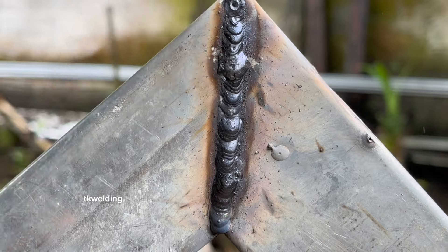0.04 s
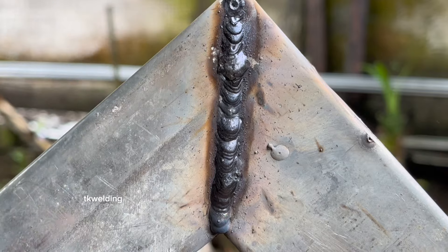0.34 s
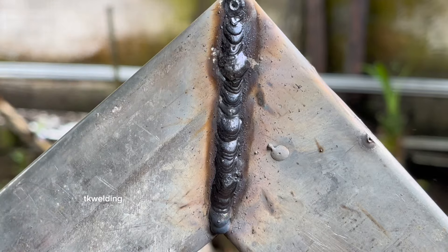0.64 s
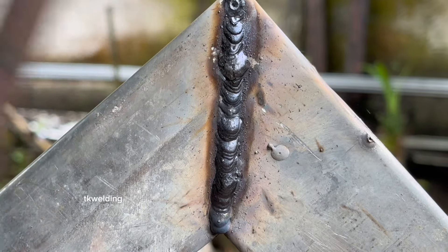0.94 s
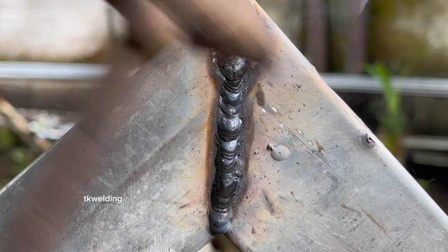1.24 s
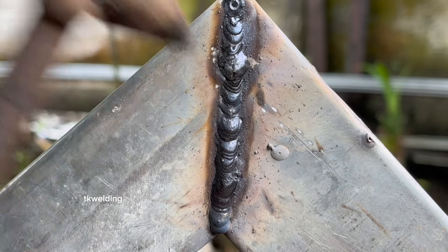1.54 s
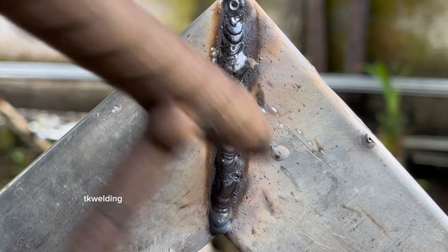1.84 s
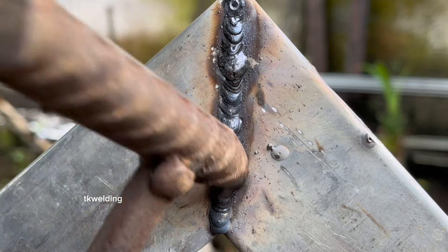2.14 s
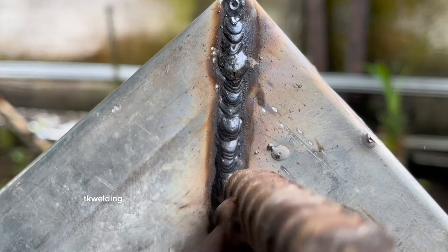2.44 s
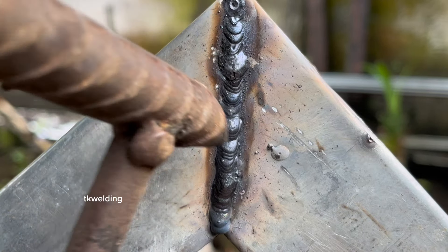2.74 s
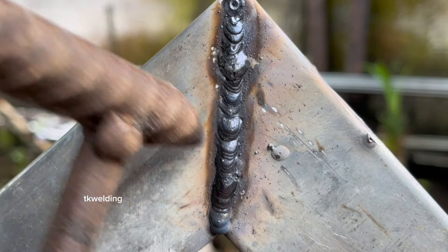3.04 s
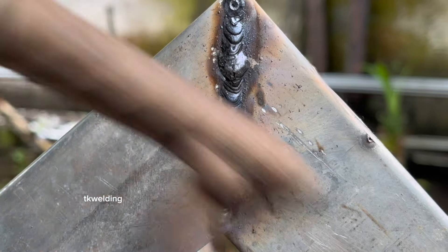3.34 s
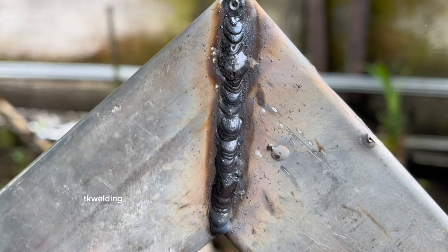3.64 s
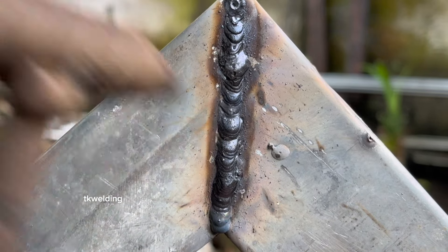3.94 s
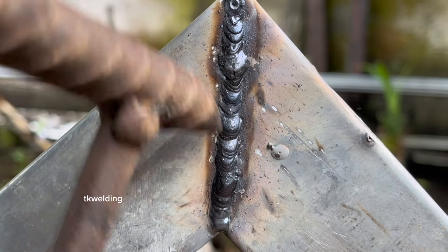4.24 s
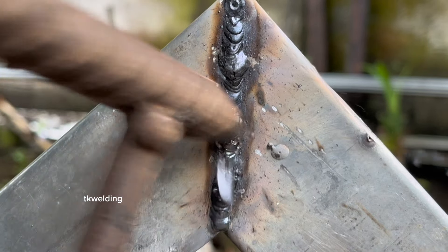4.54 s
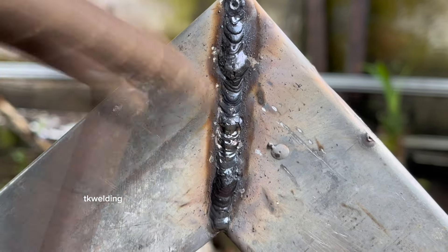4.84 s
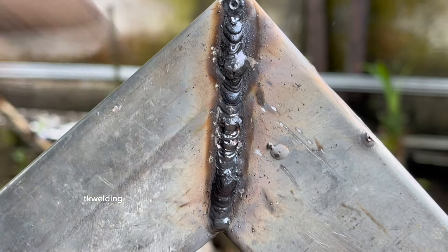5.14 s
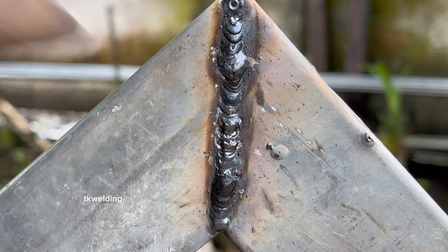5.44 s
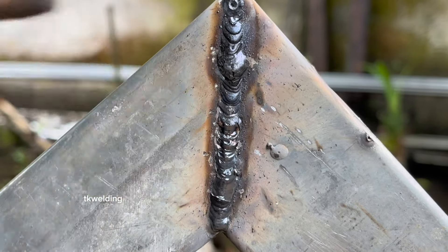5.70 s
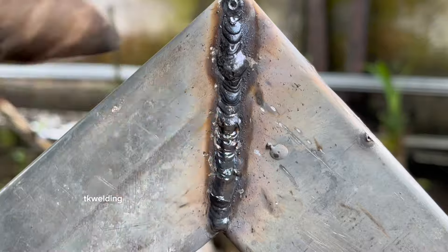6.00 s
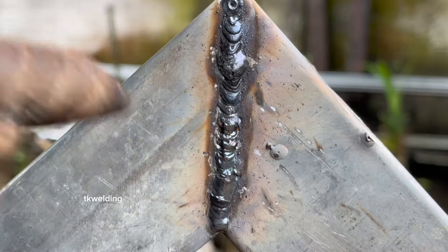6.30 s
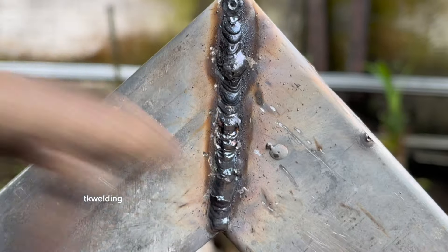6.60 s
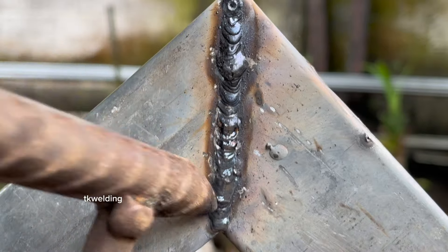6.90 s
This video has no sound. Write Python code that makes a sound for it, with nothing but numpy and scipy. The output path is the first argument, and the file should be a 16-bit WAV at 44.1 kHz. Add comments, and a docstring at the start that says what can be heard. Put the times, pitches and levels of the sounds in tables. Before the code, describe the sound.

A hammer knocks on a welded steel pipe in steady, sharp, clanging blows, each ringing briefly, close up in a workshop.

```python
"""A chipping hammer knocks slag off the weld of a mitred steel pipe, close to a phone mic in a workshop.
Each blow cracks, thuds, clangs and leaves pipe and hammer ringing; where the tip lands decides which
modes speak. Early on the tip skids on the bead, and now and then flakes of slag tick down.
The room answers over a faint, distant hum and hiss; at this range the phone rounds the peaks."""
import sys
import numpy as np
from scipy import signal
from scipy.fft import rfft, irfft, next_fast_len
from scipy.io import wavfile

SR = 44100
rng = np.random.default_rng(int(sys.argv[2]) if len(sys.argv) > 2 else 0)


def output_pcm(signal):
    """Save a mono or channel-first signal as 16-bit PCM at the path in sys.argv[1].

    Samples are clipped to [-1, 1] before scaling.
    """
    pcm = np.clip(np.atleast_2d(signal).T, -1, 1) * 32767
    wavfile.write(sys.argv[1], SR, np.round(pcm).astype(np.int16))


N = 311346

# blows on the weld: (time [s], place along it [0-1], place across it [0-1], force [dB], pipe ring [dB],
# clang pitch [Hz], clang level [dB], handle ring [dB])
HAMMER_BLOWS = [(0.1249, 0.18, 0.48, -1.5, 0.5, 1056, -21.5, -23.5),
                (0.4529, 0.92, .58, -1.5, -2, 1378, -27, -22.5),
                (0.7506, 0.19, 0.01, 0, -2, 1300, -19.5, -22.5), (1.075, .18, 0.09, 0, 3, 1326, -15.5, -32),
                (1.4165, 0.25, .46, 0.5, -1, 1277, -21.5, -37),
                (1.7294, 0.68, 0.73, 3, -3.5, 1360, -27.5, -44),
                (2.056, 0.92, 0.54, 0.5, -1.5, 1434, -20, -32),
                (3.3412, .2, 0.87, -1.5, -1.5, 1084, -16.5, -41),
                (3.7702, 0.64, 0.07, -1, -3.5, 1275, -31.5, -20),
                (4.1965, 0.52, .15, -1.5, -2, 1034, -33.5, -22),
                (4.522, 0.79, 0.83, 2.5, 0, 1056, -26, -26), (4.8583, 0.8, 0.42, 3, 0.5, 1093, -20, -22.5),
                (5.1907, .76, 0.81, 0, -0.5, 1090, -21.5, -41),
                (5.4978, 0.76, 0.76, -1, -0.5, 1300, -20.5, -47),
                (5.8065, .36, 0.06, 1, -1, 1307, -20, -34),
                (6.0947, 0.74, 0.26, -1.5, -2.5, 1346, -20, -36),
                (6.3722, 0.38, 0.9, 1, -2.5, 1269, -16, -25), (6.6367, 0.45, .82, -.5, 2, 1498, -22, -40),
                (6.8913, 0.04, 0.05, 2.5, -8.5, 1340, -17, -27.5)]
# clear modes of the pipe: (pitch [Hz], level [dB], t60 at the usual clang [s],
# shape along the weld [half waves], shape across it [half waves], antinode offset [half waves])
RING_MODES = [(222, -43.5, 1, 2.44, -2.51, 0.32), (277, -45, 1, 3.39, 1.53, 0.61),
              (528, -39, 0.7, 2.77, 0.03, 0.06), (1018, -25, 0.18, 3.17, 1.74, 0.05),
              (1051, -22, 0.32, 2.25, 1.35, 0.93), (1116, -23, 0.25, 0.46, -1.33, 0.44),
              (1240, -21, 0.24, 0.48, 2.61, 0.26), (1399, -27, 0.2, 3.12, 0.67, 0.59),
              (1545, -32, 0.22, 2.92, 0.28, 0.91), (1644, -24, 0.26, 2.03, -2.41, 0.12),
              (2253, -28, 0.22, 0.85, 2.55, 0.15), (2392, -36, 0.42, 3.03, 2.23, 0.66),
              (2546, -30, 0.34, 3.03, -0.5, 0.27), (3017, -27, 0.24, 2.77, -2.52, 0.34),
              (3220, -11.5, 0.28, 1.04, 2.24, 0.15), (3262, -18, 0.16, 0.8, -2.14, 0.46),
              (3378, -25, 0.21, 2.34, -1.94, 0.48), (3592, -24, 0.19, 2.64, 1.33, 0.37),
              (3836, -34, 0.28, 0.76, -1.85, 0.07), (4185, -31, 0.26, 0.95, -2.32, 0.57),
              (4603, -37, 0.2, 1.81, 0.89, 0.15), (4780, -31, 0.18, 1.56, 0.68, 0.87),
              (6244, -33, 0.23, 0, 0.65, 0.08)]
# the tip grazing or skidding on the bead: (time [s], scratch level [dB], head ring [dB])
TIP_SKIDS = [(0.3912, -18, -21), (0.4968, -25, -42.5), (0.5173, -27, -38.5), (0.6003, -41.5, -45.5),
             (0.61, -32, -22), (0.636, -34.5, -35)]
# flakes of slag landing: (time [s], level [dB], pitch [Hz])
SLAG_FLAKES = [(0.568, -42, 10100), (2.162, -46, 8200), (2.215, -43, 8050), (2.225, -47, 8500),
               (2.292, -68, 8070), (4.441, -59, 11800), (5.044, -61, 8700), (5.7605, -65, 10200)]
# spectra of the sources and of the room's answer: (frequency [Hz], relative level [dB])
BACKGROUND_COLOUR = [(25, -34.5), (65, -8.5), (190, -21.5), (354, -12.5), (470, -16.5), (540, -6),
                     (650, -19.5), (1000, -20), (2000, -25), (3500, -27.5), (7100, -34.5), (16000, -48)]
CRACK_COLOUR = [(300, -31), (900, 1.5), (1500, -1.5), (2100, 1.5), (2900, 0), (5000, -6), (9000, -9),
                (12000, -20.5), (16000, -25)]
SHIMMER_COLOUR = [(300, -10), (700, -8.5), (1200, 2), (2000, -3), (3000, 2), (4500, -4.5), (7000, -9.5),
                  (9500, -11.5), (12000, -21), (16000, -23.5)]
THUD_COLOUR = [(40, -45), (70, -28.5), (130, -12.5), (300, -2.5), (530, 4), (780, -1), (1500, -1.5),
               (3000, -26.5)]
SCRATCH_COLOUR = [(200, -21), (800, -18), (3000, 2.5), (7000, 4.5), (10000, -0.5), (16000, -11.5)]
ROOM_COLOUR = [(40, -10.5), (110, 6.5), (185, -1.5), (290, 6.5), (420, -3.5), (900, -6.5), (2000, -9.5),
               (5000, -7.5), (16000, -22)]
# ring times of the crowded wall modes and of the room: (frequency [Hz], t60 [s])
SHIMMER_DECAY = [(300, 0.19), (1200, .2), (3000, 0.18), (6000, 0.16), (16000, .15)]
ROOM_DECAY = [(60, 0.6), (250, 0.89), (600, .8), (1500, 0.57), (5000, 0.5), (16000, 0.95)]

TOP_HZ, RING_S = 15800, 1.2
AGE = np.arange(int(RING_S * SR)) / SR  # time since a touch [s]
CRACK_DB, SHIMMER_DB, THUD_DB, HEAD_DB = -10.5, -19.5, -18, -14
TREBLE_DB, TREBLE_FROM_HZ, TREBLE_FULL_HZ = -0.8, 1500, 4500
# the touch of the tip detunes pipe and hammer a little at every blow [share of the pitch]
PIPE_DETUNE, HEAD_DETUNE = 0.0008, 0.005
# a harder blow thuds more; the hammer head pings along with the clang [dB per dB]
THUD_PER_FORCE, HEAD_PER_CLANG = 1.1, 0.44
# a tip that bites and clangs lingers and damps the pipe [share of t60 lost per dB above the usual]
DAMP_PER_CLANG, USUAL_CLANG_DB = 0.012, -22.5


def undb(db):
    """Decibels to gain."""
    return 10 ** (np.asarray(db) / 20)


def unit(x):
    """Scale to rms 1."""
    return x / np.sqrt(np.mean(x ** 2))


def read(points, hz):
    """Read (frequency [Hz], value) points on a log-frequency axis."""
    f, value = np.transpose(points)
    return np.interp(np.log(np.maximum(hz, 1)), np.log(f), value)


def fade(t60):
    """Free decay, 60 dB in t60 seconds."""
    return np.exp(-np.log(1000) * AGE / t60)


def swell(rise_s):
    """Onset from 0 to 1 with time constant rise_s."""
    return 1 - np.exp(-AGE / rise_s)


def colour(x, points):
    """Minimum-phase filter through (frequency [Hz], gain [dB]) points."""
    size = next_fast_len(2 * len(x), True)
    size += size % 2
    hz = np.arange(size // 2 + 1) * SR / size
    cepstrum = irfft(np.log(undb(read(points, hz))))
    cepstrum[1:size // 2] *= 2
    cepstrum[size // 2 + 1:] = 0
    return irfft(rfft(x, size) * np.exp(rfft(cepstrum)))[:len(x)]


def noise(points, size=len(AGE)):
    """Coloured noise of rms 1."""
    white = rfft(rng.standard_normal(size))
    hz = np.arange(len(white)) * SR / size
    return unit(irfft(white * undb(read(points, hz)), size))


def burst(points, t60):
    """A short rattle of waves whose energy depends only on t60."""
    envelope = fade(t60)
    return unit(noise(points) * envelope) * np.sqrt(np.mean(envelope ** 2))


def tone(hz, detune):
    """A sine of chance phase, a little off its pitch."""
    phase, offset = rng.random(), rng.standard_normal()
    return np.sin(2 * np.pi * (hz * (1 + detune * offset) * AGE + phase))


def tail(spectrum, t60s, count=12):
    """Countless modes dying away, each band at its own pace."""
    hz = np.arange(len(spectrum)) * SR / len(AGE)
    centres = np.geomspace(50, TOP_HZ, count)
    out = 0
    for centre, share in zip(centres, np.eye(count)):
        band = read(np.c_[centres, share], hz)
        out += irfft(spectrum * band, len(AGE)) * fade(read(t60s, centre))
    return out


def add(track, s, sound):
    """Mix a sound in at time s."""
    start = int(s * SR)
    track[start:start + len(sound)] += sound[:max(N - start, 0)]


def background(level_db=-61):
    """Steady hum and hiss, far from the microphone."""
    return undb(level_db) * noise(BACKGROUND_COLOUR, size=N)


def crack(t60=0.022):
    """The sharp contact of tip and weld."""
    return burst(CRACK_COLOUR, t60)


def wall_modes(count=520):
    """Line spectrum of the crowded higher modes of the thin walls, the same for every blow."""
    lines = np.zeros(len(AGE) // 2 + 1)
    hz = (np.arange(count) + rng.random(count)) / count * TOP_HZ
    lines[(hz * RING_S).astype(int)] = undb(2 * rng.standard_normal(count))
    return unit(lines)


def shimmer(lines, blur=1.1):
    """A blow drives the wall modes by chance amounts; nearby surfaces blur the lines."""
    drive = rfft(noise(SHIMMER_COLOUR)) * np.hypot(lines, blur) / np.hypot(1, blur)
    return tail(drive, SHIMMER_DECAY)


def contact_ripple(ripple_db=4.5, step_hz=130):
    """Every spot on the bead favours other bands of the walls: (frequency [Hz], gain [dB])."""
    hz = np.arange(100, TOP_HZ, step_hz)
    favour = np.clip(rng.standard_normal(300)[:len(hz)], -2, 2)
    return np.c_[hz, ripple_db * favour]


def thud(lag_s=0.002616, lag_hz=600, rattle_db=-5):
    """Bending waves run to the edge of the pipe: the lower they are, the later they arrive."""
    hz = np.maximum(np.arange(len(AGE) // 2 + 1) * SR / len(AGE), 1)
    turns = 2 * lag_s * np.sqrt(lag_hz * hz) + rng.random()
    spectrum = undb(read(THUD_COLOUR, hz)) * np.exp(-2j * np.pi * turns)
    wave = irfft(spectrum, len(AGE)) * fade(t60=0.12)
    rattle = burst(THUD_COLOUR, t60=0.027)
    return unit(wave) * np.std(rattle) + undb(rattle_db) * rattle


def clang(hz, t60=0.15, spread=0.15, count=7):
    """A cluster of quickly damped modes of the hammer itself."""
    offsets = np.linspace(-1, 1, count) + 0.15 * rng.standard_normal(count)
    pitches = hz * (1 + spread * offsets)
    modes = np.sin(2 * np.pi * (np.outer(pitches, AGE) + rng.random((count, 1))))
    weights = np.hanning(count + 2)[1:-1]
    return unit(weights @ modes) * fade(t60) * swell(rise_s=0.00074)


def pipe_ring(along, across, sustain, node_leak=0.07):
    """Each mode is driven as far as it moves at the struck place, and swells as waves fill the pipe."""
    out = 0
    for hz, db, t60, waves_along, waves_across, offset in RING_MODES:
        shape = np.cos(np.pi * (waves_along * along + waves_across * across + offset))
        drive = undb(db) * np.sqrt(node_leak + shape ** 2)
        out += drive * fade(t60 * sustain) * tone(hz, PIPE_DETUNE)
    return out * swell(rise_s=0.0064)


def head_ring(overtone_db, t60, head_hz=2845, overtone_hz=5560):
    """The short ping of the hammer head."""
    return (tone(head_hz, HEAD_DETUNE) + undb(overtone_db) * tone(overtone_hz, HEAD_DETUNE)) * fade(t60)


def handle_ring(hz=2651, t60=0.35):
    """The steel handle takes up the blow and sings one clear tone."""
    return tone(hz, PIPE_DETUNE) * fade(t60) * swell(rise_s=0.008)


def hammer_blows():
    """Tip on weld, close up: a crack, the thud of the walls, a clang, then pipe and hammer ring on."""
    out, lines = np.zeros(N), wall_modes()
    for s, along, across, force_db, ring_db, clang_hz, clang_db, handle_db in HAMMER_BLOWS:
        bright = undb(CRACK_DB) * crack() + undb(SHIMMER_DB) * shimmer(lines)
        bright = colour(bright, contact_ripple())
        # the shorter contact of a harder blow reaches higher
        bright = colour(bright, [(TREBLE_FROM_HZ, 0), (TREBLE_FULL_HZ, TREBLE_DB + force_db)])
        body = undb(THUD_DB + THUD_PER_FORCE * force_db) * thud() + undb(clang_db) * clang(clang_hz)
        sustain = np.exp(-DAMP_PER_CLANG * (clang_db - USUAL_CLANG_DB))
        pipe = undb(ring_db) * pipe_ring(along, across, sustain)
        head = undb(HEAD_DB + HEAD_PER_CLANG * clang_db) * head_ring(overtone_db=-15.5, t60=0.19)
        add(out, s, bright + body + pipe + head + undb(handle_db) * handle_ring())
    return out


def workshop(x, wet_db=-13.5, build_s=0.0084):
    """Diffuse reverberation from the room around the microphone, strongest in the bass."""
    white = rfft(rng.standard_normal(len(AGE)))
    build_up = 1 - np.exp(-(AGE / build_s) ** 2)
    response = colour(tail(white, ROOM_DECAY), ROOM_COLOUR) * build_up
    response /= np.linalg.norm(fade(t60=0.4))
    return undb(wet_db) * signal.fftconvolve(x, response)[:N]


def skids(walls_db=-13, bite_s=0.00097):
    """The tip scratches over brittle slag and the head pings; a glancing touch takes a moment to bite."""
    out = np.zeros(N)
    for s, scratch_db, head_db in TIP_SKIDS:
        scratch = colour(burst(SCRATCH_COLOUR, t60=0.051), contact_ripple())
        walls = undb(walls_db) * burst(SHIMMER_COLOUR, t60=0.23)
        head = undb(head_db) * head_ring(overtone_db=-9, t60=0.068)
        add(out, s, (undb(scratch_db) * (scratch + walls) + head) * swell(bite_s))
    return out


def flakes(t60=0.062):
    """Glassy flakes of slag tick against the steel."""
    out = np.zeros(N)
    for s, db, hz in SLAG_FLAKES:
        tick_colour = [(800, -12), (hz * 0.75, -11), (hz, 0), (hz * 1.15, -11)]
        add(out, s, undb(db) * burst(tick_colour, t60))
    return out


def scene():
    """At the microphone, in mono: the hammer close by, the workshop around it, the far background."""
    work = hammer_blows() + skids() + flakes()
    return (work + workshop(work) + background())[None]


def record(dry, low_hz=82, ceiling=0.62):
    """The phone rounds the loudest peaks and cuts the deep bass and the top."""
    rounded = dry / (1 + (dry / ceiling) ** 4) ** (1 / 4)
    low_cut = signal.butter(2, low_hz, "high", fs=SR, output="sos")
    top_cut = signal.ellip(10, 0.2, 80, TOP_HZ, fs=SR, output="sos")
    return signal.sosfilt(top_cut, signal.sosfilt(low_cut, rounded))


dry = scene()
out = record(dry)
output_pcm(out)
```